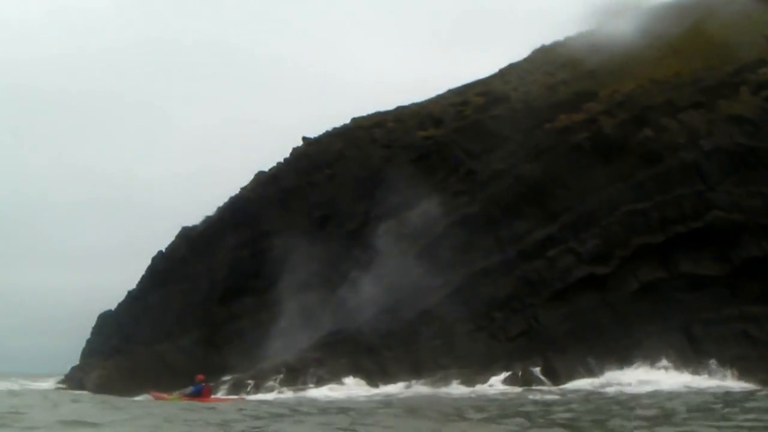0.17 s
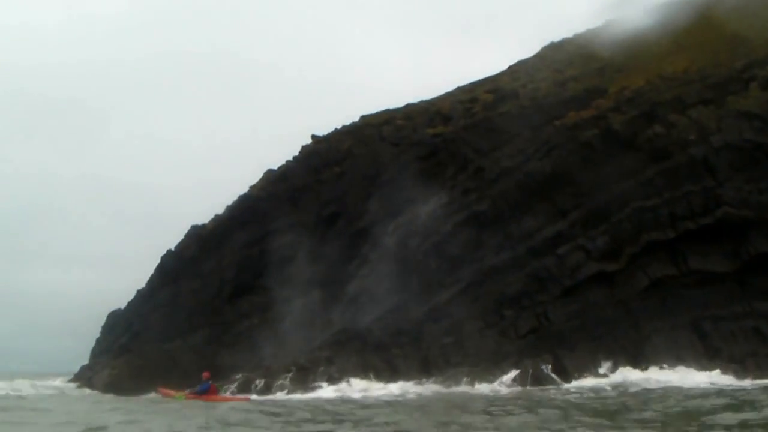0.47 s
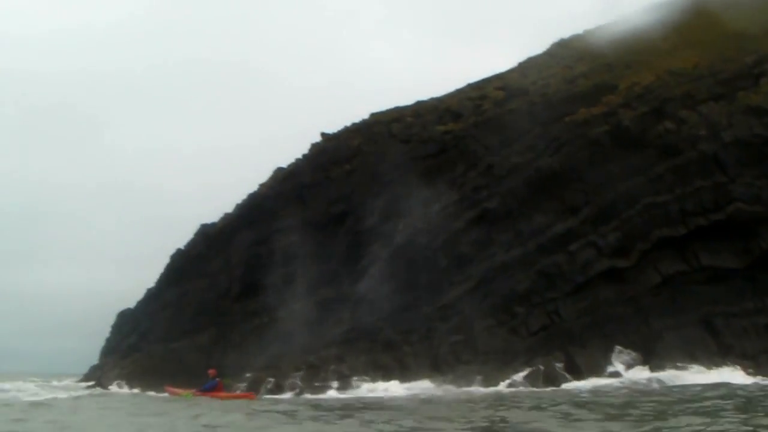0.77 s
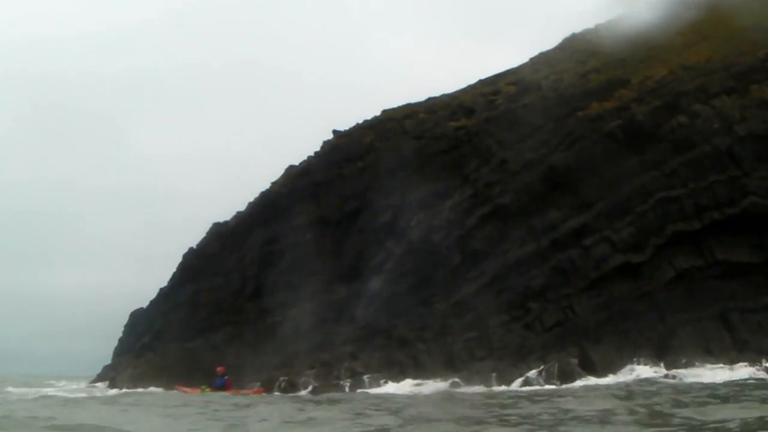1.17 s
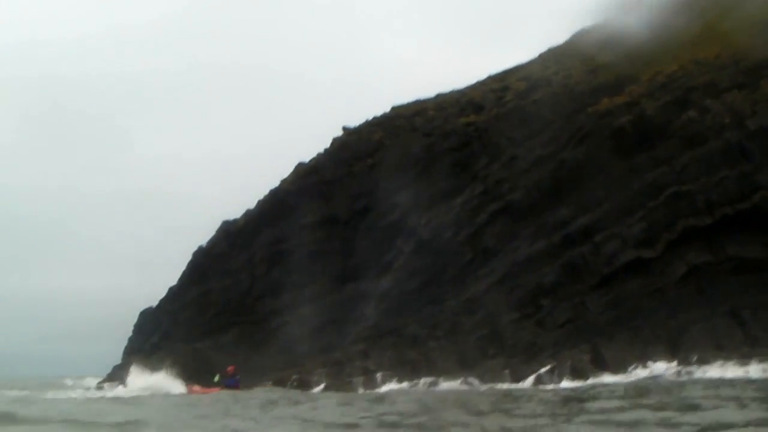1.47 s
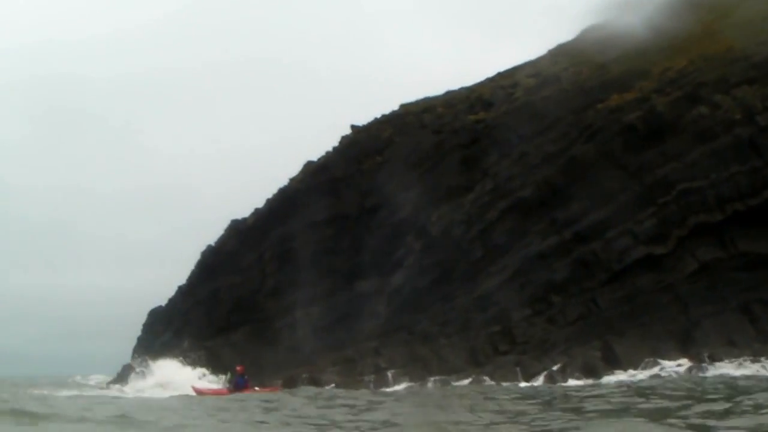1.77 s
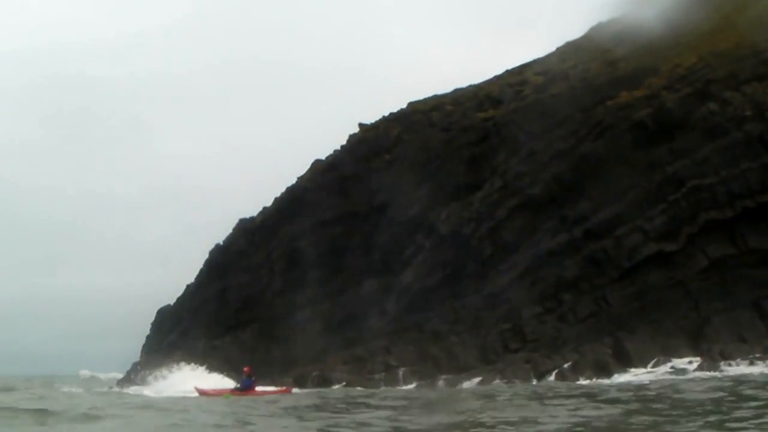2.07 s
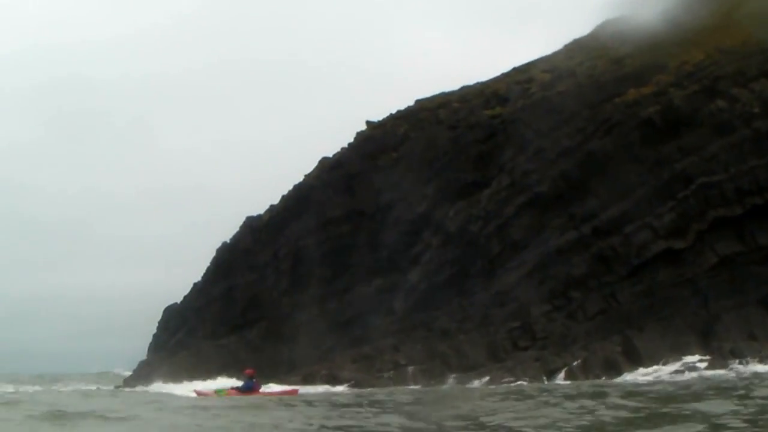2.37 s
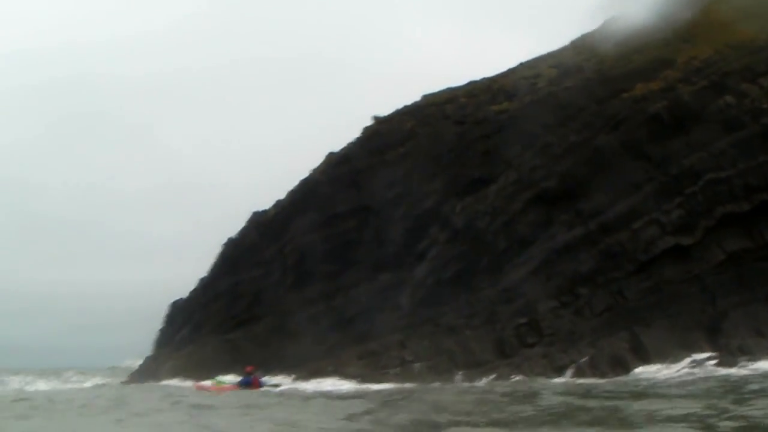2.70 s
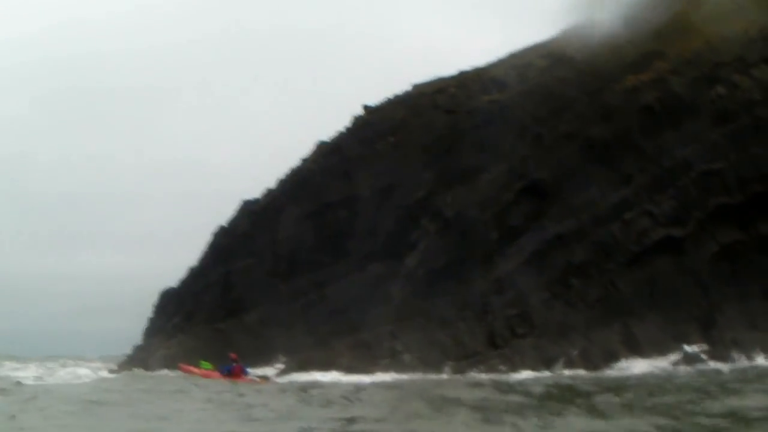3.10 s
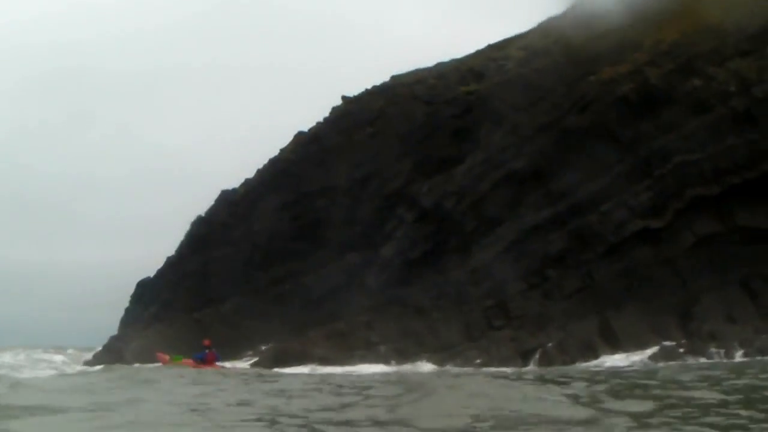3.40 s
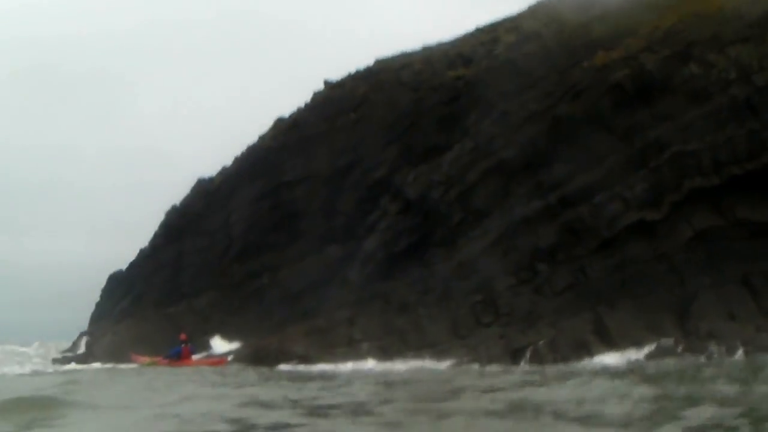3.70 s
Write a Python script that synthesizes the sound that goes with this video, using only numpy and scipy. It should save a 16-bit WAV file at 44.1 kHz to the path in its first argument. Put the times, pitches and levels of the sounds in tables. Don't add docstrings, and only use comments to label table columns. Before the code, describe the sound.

Broad surf roar runs throughout over a low boom beneath a sea cliff, with foam hiss and fine sizzle brightest in the first second, then duller. Droplets tick close by, with plinks near 0.3, 0.5 and 2.35 s and the sharpest at 1.4 s. Wind shoves and pops the microphone around 1.5-1.9 s; short wave surges come at 2.0-2.2 s, low thumps until 2.5 s, then steadier wash to the end.

```python
import sys
import numpy as np
from scipy import signal
from scipy.fft import rfft, irfft, next_fast_len
from scipy.io import wavfile
from scipy.ndimage import uniform_filter1d

SR = 44100
rng = np.random.default_rng(int(sys.argv[2]) if len(sys.argv) > 2 else 0)


def transcribe(u):
    v = np.clip(np.atleast_2d(u).T, -1, 1)
    q = np.round(v * 32767).astype(np.int16)
    wavfile.write(sys.argv[1], SR, q)


def elevation(decibels):
    levels = np.asarray(decibels, float)
    return 10 ** (levels / 20)


N = 169785
T = np.arange(N) / SR

# start_s [s], roar_db [dB], hiss_db [dB], mist_db [dB]
SURF_LEVELS = [(0, -30.5, -39.5, -47.5), (.35, -28.5, -37.5, -45), (.62, -29, -39, -47.5),
               (.7, -30, -39.5, -46), (.99, -29, -43.5, -53.5), (1.4, -31.5, -43.5, -52),
               (1.72, -30, -44, -56), (1.85, -31, -45.5, -55.5), (2.16, -35, -43, -54.5),
               (2.35, -29, -40.5, -52.5), (2.47, -32.5, -40.5, -52), (2.7, -30.5, -44, -55.5),
               (3.01, -31.5, -45, -56), (3.08, -34.5, -45, -58), (3.25, -32.5, -44.5, -53.5),
               (3.45, -31, -45, -54), (3.6, -30, -45, -54.5), (3.85, -33, -44.5, -55.5)]
# start_s [s], level_db [dB]
SHORE_LEVELS = [(0, -34), (.3, -33.5), (.6, -34.5), (1.2, -34.5), (1.55, -34), (2.0, -34.5), (2.24, -36.5),
                (2.31, -32.5), (2.4, -34), (2.65, -34), (2.8, -37), (3.0, -32.5), (3.2, -35.5),
                (3.25, -30.5), (3.32, -36.5), (3.5, -33), (3.85, -34)]
# centre_s [s], level_db [dB], half_length_s [s]
WAVE_CRESTS = [(0.078, 1, .06), (0.197, 1.5, 0.041), (0.613, 3, 0.039), (0.648, -1.5, 0.013),
               (0.797, 1, 0.033), (.99, -0.5, .02), (1.103, 0.5, .05), (1.29, -1, 0.037), (1.338, 1, .02),
               (1.517, 3, .015), (1.66, 1, .03), (1.73, 1.4, 0.016), (1.83, -2.5, 0.018),
               (1.943, 2.5, 0.018), (2.018, 6.5, 0.0069), (2.1, 4.5, 0.025), (2.164, -0.5, 0.022),
               (2.21, 4.5, 0.022), (2.307, -0.5, .02), (2.35, 0, .02), (2.43, 0, .03), (2.564, 2.5, .04),
               (2.78, -0.5, .04), (2.91, 1, .04), (3.017, 1.5, 0.023), (3.078, 0.5, .05), (3.2, 0.5, 0.035),
               (3.43, 1, 0.035), (3.6, -0.5, .05), (3.72, -0.5, .03)]
# start_s [s], level_db [dB]
CLIFF_THUDS = [(0.0, -40), (0.19, -42.5), (0.21, -38.5), (0.77, -40.5), (0.88, -46), (0.92, -38.5),
               (1.26, -43.5), (1.53, -41), (1.56, -40), (1.67, -38), (1.8, -46.5), (2.34, -43.5),
               (2.44, -38), (2.49, -43.5), (3.47, -42), (3.5, -48), (3.78, -42), (3.85, -49)]
# pitch_hz [Hz], density_db [dB per Hz]
BOOM_SPECTRUM = [(15, -46), (30, -26), (48, -29), (70, -13.5), (103, -2), (130, 0.5), (195, 3), (245, -16)]
# pitch_hz [Hz], density_db [dB per Hz]
ROAR_SPECTRUM = [(140, -72), (245, -22.5), (356, -2.5), (400, 0), (826, -10), (1120, -12.5), (1320, -15),
                 (2920, -22), (4000, -24.5), (5200, -26.5), (8800, -120)]
# pitch_hz [Hz], density_db [dB per Hz]
FOAM_SPECTRUM = [(1500, -20), (3000, -15.5), (4500, -6), (6200, 2), (7000, -0.5), (7600, -7.5), (8000, -39),
                 (9000, -56)]
# pitch_hz [Hz], density_db [dB per Hz]
MIST_SPECTRUM = [(6000, -40), (8300, -4), (9600, -6), (11800, -6), (12600, -2.5), (13600, 1), (15000, -3.5),
                 (16000, -6)]
# start_s [s], level_db [dB]
GUST_LEVELS = [(0, -58), (.8, -71), (1.1, -51), (1.3, -50), (1.54, -41), (1.75, -40.5), (2.0, -50.5),
               (2.2, -45), (2.5, -47), (2.65, -57), (3.25, -46), (3.5, -58), (3.85, -63)]
# pitch_hz [Hz], density_db [dB per Hz]
WIND_SPECTRUM = [(15, -22), (70, -22.5), (110, 1.5), (150, -6), (200, -20), (245, -18), (380, -12),
                 (600, -50)]
# start_s [s], peak_db [dB], pitch_hz [Hz]
WIND_SHOVES = [(0, -48, 40), (.68, -31, 90), (1.08, -39, 80), (1.37, -44, 80), (1.499, -34, 115),
               (1.655, -35, 135), (2.431, -31, 110), (3.08, -45, 90), (1.51, -51, 45), (1.65, -44, 55),
               (1.6, -46, 45), (2.11, -41, 80), (1.715, -43, 55), (1.925, -32, 35), (1.985, -40, 60),
               (2.015, -33, 50), (2.085, -35, 55), (2.212, -33, 55), (2.355, -39, 32), (2.425, -37, 60),
               (2.45, -40, 60)]
# start_s [s], peak_db [dB], pitch_hz [Hz]
EDDY_POPS = [
    (1.525, -32, 420),
    (1.588, -27, 380),
    (1.612, -26, 380),
    (1.63, -33, 430),
    (1.663, -31, 360),
    (1.783, -29, 400),
    (1.895, -39, 380),
]
# centre_s [s], peak_db [dB], pitch_hz [Hz], left_over_right_db [dB]
FINE_TICKS = [(0.3122, -31, 14900, -2.0), (0.5267, -34, 13200, -1.0), (0.7188, -32, 12900, 1.0),
              (0.9782, -27, 13900, -1.0), (1.0425, -28, 13000, -1.5), (1.3299, -32, 14100, -1.0),
              (1.4032, -36, 13100, 1.0), (1.6127, -38, 13400, -1.5), (1.6666, -38, 13200, 0.0),
              (1.927, -38, 14800, -2.0), (1.9684, -35, 14100, -0.5), (2.0482, -39, 14500, -0.5),
              (2.3511, -27, 14500, -4.5), (2.5845, -33, 14700, -2.5), (3.2031, -41, 14300, 1.0),
              (3.476, -37, 13200, -0.5)]
# start_s [s], peak_db [dB], pitch_hz [Hz], t60_s [s]
RINGING_DROPS = [(.313, -26, 5550, .005), (.527, -22, 6600, .007), (.549, -26, 2700, .007),
                 (.66, -27, 6800, .004), (2.351, -27, 5500, .004), (1.408, -44.5, 11100, .02),
                 (1.411, -39, 7900, .004), (.66, -28, 13800, .0025), (.315, -31, 14500, .005),
                 (2.341, -40, 13600, .004), (1.48, -39, 14300, .003), (2.62, -41, 14800, .003),
                 (3.243, -40, 13000, .003)]
# centre_s [s], peak_db [dB], pitch_hz [Hz], half_length_s [s]
DROP_STRIKE = [
    (1.4114, -15.5, 5650, .00032),
    (1.4127, -27, 5100, .0004),
    (1.4141, -31, 5000, .0005),
    (1.4174, -21, 5950, .00055),
    (1.419, -28, 5950, .0009),
]
SPRAY_BAND = [11500, 15500]
# pitch_hz [Hz], side_over_mid_db [dB]
STEREO_WIDTH = [(30, -16), (120, -14), (400, -19), (1000, -18), (2500, -9.5), (5000, -5), (9000, -2),
                (15000, -6.5)]
# pitch_hz [Hz], left_over_right_db [dB]
PORT_BALANCE = [(60, -0.6), (1500, -0.4), (3000, 0.5), (7100, 1.5), (8400, -7), (10500, 6), (11300, -2),
                (15000, 0)]
# pitch_hz [Hz], level_db [dB rms]
HUM_LINES = [
    (29.97, -74),
    (59.94, -59),
    (119.88, -51),
    (15734, -82),
]


def rms_one(x):
    return x / np.sqrt(np.mean(x ** 2) + 1e-20)


def in_time(rows):
    s, *columns = np.transpose(rows)
    return [np.interp(T, s, column) for column in columns]


def at_hz(points, hz):
    point_hz, db = np.transpose(points)
    return np.interp(np.log(hz), np.log(point_hz), db)


def drift(rate):
    r = np.exp(-80 * np.pi * rate / SR)
    noise = rng.standard_normal(N // 40 + 2002)
    slow = signal.lfilter([1], [1, -2 * r, r * r], noise)[2000:]
    return np.interp(np.arange(N) / 40, np.arange(len(slow)), rms_one(slow))


def wash(spectrum, shared_db, own_db, rate, wider_db=0, count=6):
    size = next_fast_len(N)
    hz = np.maximum(np.arange(size // 2 + 1) * SR / size, 1)
    low_hz, high_hz = spectrum[0][0], spectrum[-1][0]
    shape = elevation(at_hz(spectrum, hz)) * (hz > low_hz) * (hz < high_hz)
    shape = shape / np.sqrt(np.mean(shape ** 2))
    mid, side = rfft(rng.standard_normal((2, size))) * shape
    side = side * elevation(at_hz(STEREO_WIDTH, hz) + wider_db)
    centres = np.geomspace(low_hz, high_hz, count)
    together = drift(rate / 4)
    for k, centre in enumerate(centres):
        part = np.interp(np.log(hz), np.log(centres), np.arange(count) == k)
        gain = elevation(shared_db * together + own_db * drift(rate))
        band = irfft(np.array([mid + side, mid - side]) * part, size)[:, :N]
        power = uniform_filter1d(uniform_filter1d(np.mean(band ** 2, axis=0), 4000), 4000)
        yield centre, gain * band * np.sqrt(power.mean() / power)


def roar(roar_db, hiss_db):
    shore_db, = in_time(SHORE_LEVELS)
    thud_db, = in_time(CLIFF_THUDS)
    crest_db = sum(db * np.exp(-((T - s) / half) ** 2) for s, db, half in WAVE_CRESTS)
    near_db = roar_db - roar_db.mean() + crest_db
    far_db = shore_db - shore_db.mean() + 0.93
    spray_db = 0.49 * (hiss_db - hiss_db.mean())
    breakers = np.zeros((2, N))
    for hz, band in wash(ROAR_SPECTRUM, shared_db=.4, own_db=1.1, rate=7.0, count=8):
        level_db = spray_db if hz > 2000 else far_db if hz > 900 else near_db
        breakers += band * elevation(level_db)
    boom = sum(band for _, band in wash(BOOM_SPECTRUM, shared_db=.5, own_db=1.0, rate=6.0, count=4))
    return elevation(roar_db.mean() + 2) * breakers + elevation(thud_db - 1) * rms_one(boom)


def ring(clicks, hz, t60):
    r = elevation(-60 / (t60 * SR))
    w = 2 * np.pi * min(hz, .45 * SR) / SR
    return signal.lfilter([0, np.sin(w)], [1, -2 * r * np.cos(w), r * r], clicks + 1e-18)


def bubbles(per_s, low_hz, high_hz, cycles):
    sizes = elevation(3.5 * np.minimum(rng.exponential(1, (3, N)), 5))
    clicks = sizes * (rng.random((3, N)) < per_s / SR)
    dealt = rng.integers(0, 6, (3, N))
    pitches = np.geomspace(low_hz, high_hz, 6)
    left, right, both = sum(ring(clicks * (dealt == k), hz, cycles / hz) for k, hz in enumerate(pitches))
    return rms_one(np.array([left, right]) + both)


def foam(hiss_db, mist_db):
    hiss = sum(band for _, band in wash(FOAM_SPECTRUM, shared_db=.6, own_db=.5, rate=16.0, count=4))
    mist = sum(band for _, band in wash(MIST_SPECTRUM, shared_db=.8, own_db=.8, rate=17.0, count=5))
    fizz = bubbles(380, low_hz=2500, high_hz=7000, cycles=4.6)
    crackle = bubbles(77 * elevation(3.0 * drift(12.0)), low_hz=12500, high_hz=15200, cycles=30.0)
    low_foam = elevation(hiss_db) * (elevation(1) * hiss + elevation(-11) * fizz)
    high_mist = elevation(mist_db + 1.04) * (mist + elevation(-10) * crackle)
    return low_foam + high_mist


def add_ring(out, s, db, hz, t60, rise_s, sides):
    start = max(int(s * SR), 0)
    t = np.arange(min(int(2 * t60 * SR), N - start)) / SR
    shape = (1 - np.exp(-t / rise_s)) * elevation(-60 * t / t60) * np.sin(2 * np.pi * hz * t)
    out[:, start:start + len(t)] += elevation(db) * np.outer(sides, shape) / np.abs(shape).max()


def wind():
    gust_db, = in_time(GUST_LEVELS)
    lumps = sum(band for _, band in wash(WIND_SPECTRUM, shared_db=1.5, own_db=2.5, rate=25.0,
                                         wider_db=10, count=3))
    out = elevation(gust_db + 2) * rms_one(lumps)
    for s, db, hz in WIND_SHOVES:
        add_ring(out, s, db - 1.5, hz, t60=1.9 / hz, rise_s=.006, sides=[1, 1])
    for s, db, hz in EDDY_POPS:
        add_ring(out, s, db, hz, t60=.025, rise_s=.002, sides=[1, -1])
    return out


def blip(s, db, hz, half):
    t = T - s
    bell = np.exp(-.5 * np.minimum((t / half) ** 2, 200))
    return elevation(db) * bell * np.cos(2 * np.pi * hz * t)


def droplets():
    out = np.zeros((2, N)) + sum(blip(*row) for row in DROP_STRIKE)
    for s, db, hz, t60 in RINGING_DROPS:
        add_ring(out, s, db, hz, t60, rise_s=.0007, sides=[1, 1])
    spray_filter = signal.butter(2, SPRAY_BAND, "band", fs=SR, output="sos")
    spray = rms_one(signal.sosfilt(spray_filter, rng.standard_normal((2, N))))
    late_s, tick_half_s, spray_half_s = .0015, .00015, .018
    for s, db, hz, pan_db in FINE_TICKS:
        sides = elevation([pan_db / 2, -pan_db / 2])
        tick = blip(s + late_s, db + 3.5, hz, tick_half_s)
        skirt = blip(s + late_s, db - 12, .75 * hz, tick_half_s)
        out += np.outer(sides, tick) + np.outer(sides * [1, -1], skirt)
        first = max(int((s - 3 * spray_half_s) * SR), 0)
        last = min(int((s + 3 * spray_half_s) * SR), N)
        near = np.arange(first, last)
        puff = np.exp(-((near / SR - s) / spray_half_s) ** 2)
        out[:, near] += elevation(db - 19) * puff * spray[:, near]
    return out


def scene():
    roar_db, hiss_db, mist_db = in_time(SURF_LEVELS)
    return roar(roar_db, hiss_db) + foam(hiss_db, mist_db) + wind() + droplets()


def hum():
    out = np.zeros(N)
    for hz, db in HUM_LINES:
        out += np.sqrt(2) * elevation(db + .5 * drift(3.0)) * np.sin(2 * np.pi * hz * T)
    return out


def treble_gap(x):
    low_hz, high_hz, wander_hz = 7780, 8270, 55
    hz, frames, cells = signal.stft(x, SR, nperseg=1024)
    wander = uniform_filter1d(rng.standard_normal((2, len(frames))), size=3) * np.sqrt(3)
    low, high = wander_hz * wander
    inside = (hz[:, None] > low_hz + low) & (hz[:, None] < high_hz + high)
    filled = np.repeat(rng.random(len(frames)) < .09, 3)[:len(frames)]
    gap_db = inside * np.where(filled, -12, -45)
    field = uniform_filter1d(rng.standard_normal(inside.shape), size=2, axis=0)
    field = uniform_filter1d(field, size=5, axis=1)
    holes = (field < np.quantile(field, .1)) & (hz[:, None] > high_hz)
    return signal.istft(cells * elevation(gap_db - 25 * holes), SR, nperseg=1024)[1][:, :N]


def top_cut(x):
    return signal.sosfilt(signal.butter(12, 15900, fs=SR, output="sos"), x)


def record(dry):
    left_lag_s, top_hz = .000013, 15755
    size = next_fast_len(N + 512)
    hz = np.maximum(np.arange(size // 2 + 1) * SR / size, 1)
    port = elevation(at_hz(PORT_BALANCE, hz) / 2) * np.exp(-1j * np.pi * hz * left_lag_s)
    heard = irfft(rfft(dry, size) * [port, 1 / port] * (hz < top_hz), size)[:, :N]
    return top_cut(treble_gap(heard + hum()))


dry = scene()
out = record(dry)
transcribe(out)
```